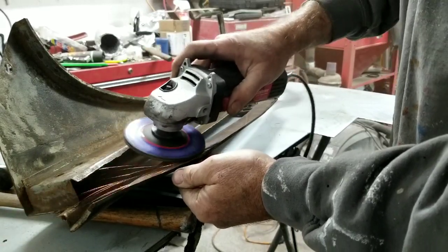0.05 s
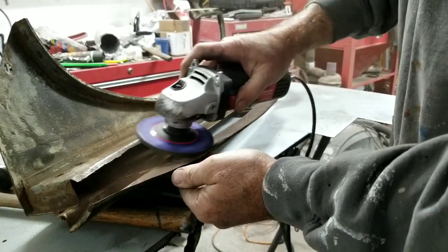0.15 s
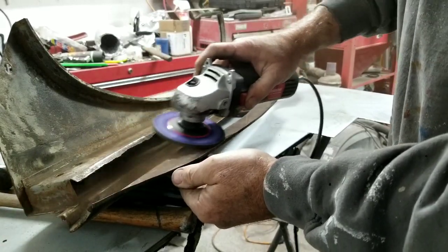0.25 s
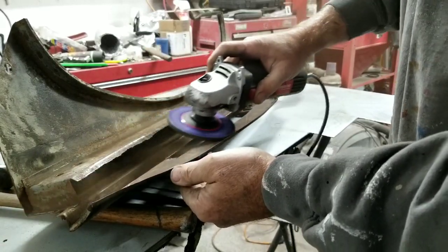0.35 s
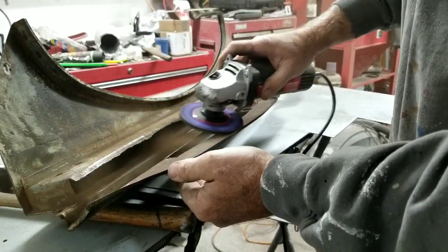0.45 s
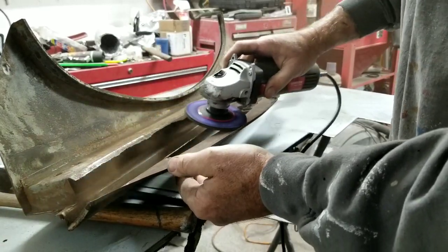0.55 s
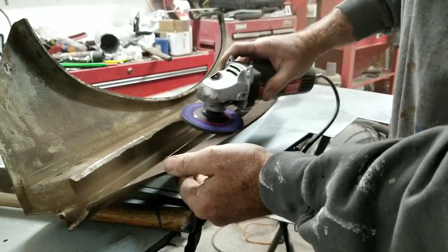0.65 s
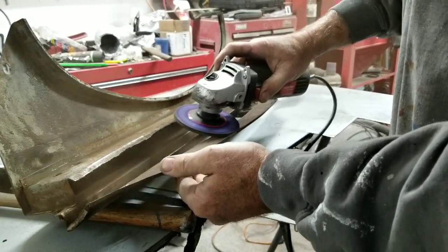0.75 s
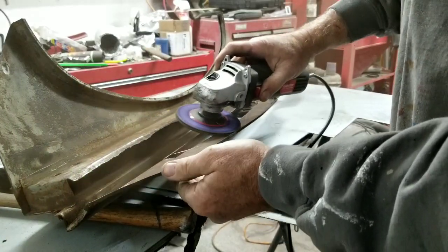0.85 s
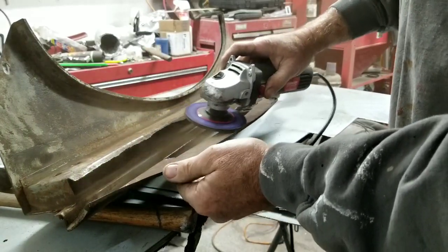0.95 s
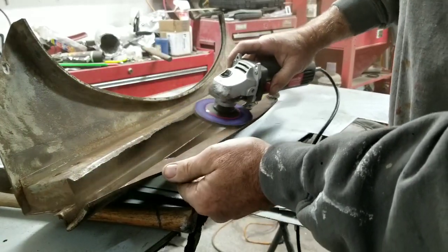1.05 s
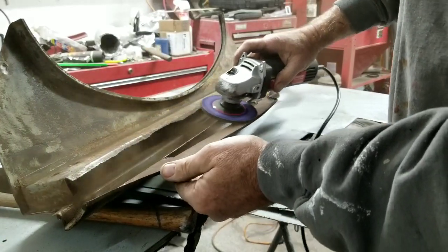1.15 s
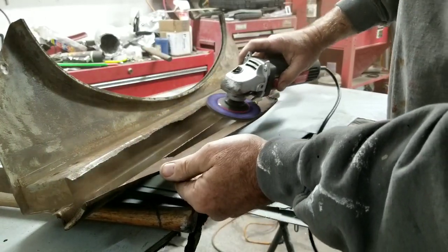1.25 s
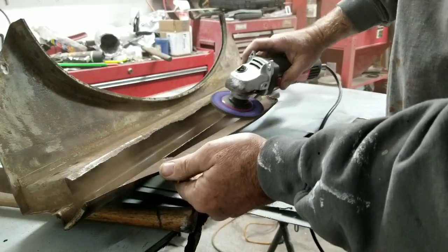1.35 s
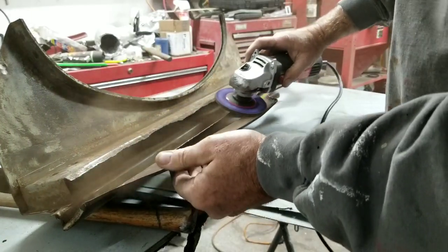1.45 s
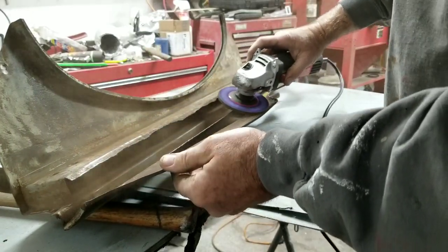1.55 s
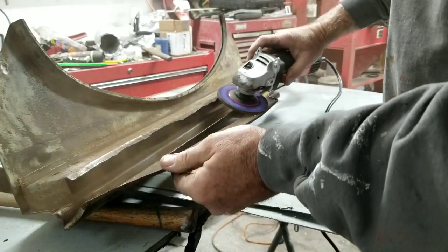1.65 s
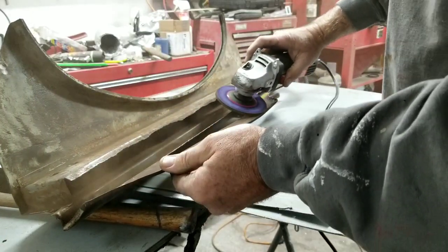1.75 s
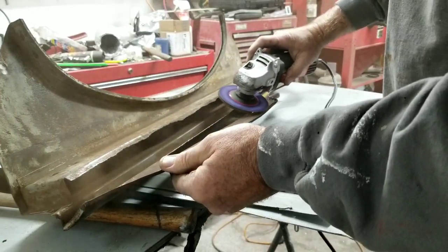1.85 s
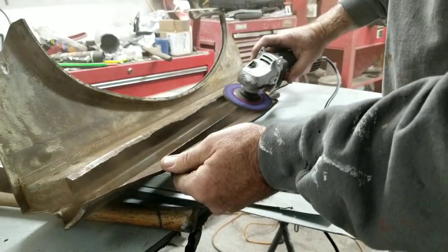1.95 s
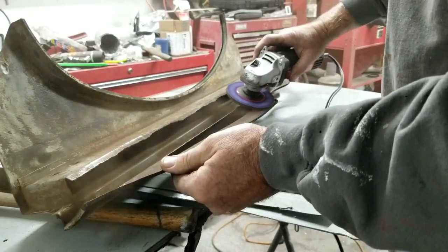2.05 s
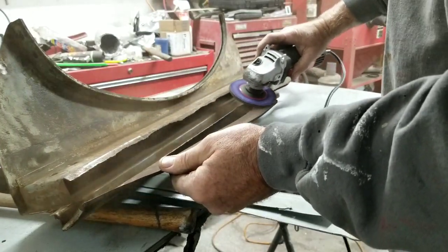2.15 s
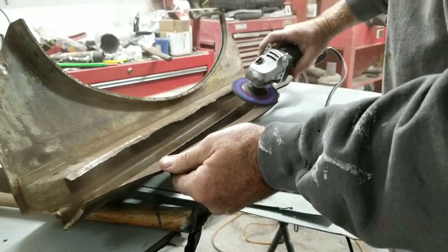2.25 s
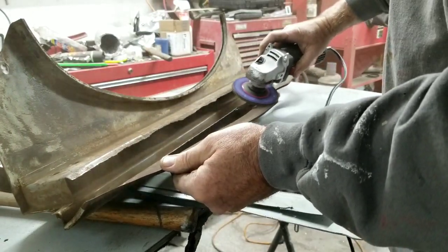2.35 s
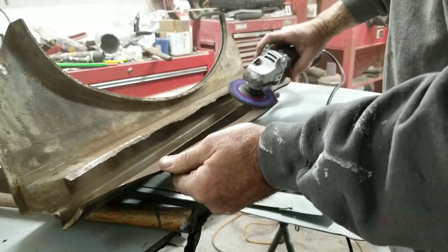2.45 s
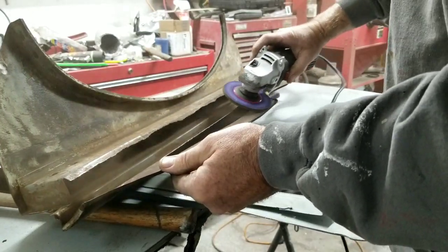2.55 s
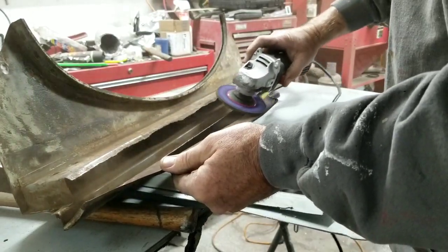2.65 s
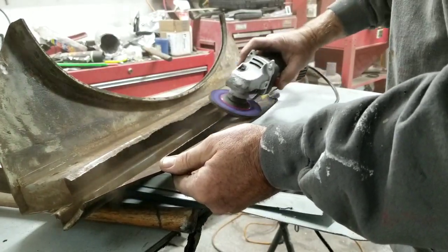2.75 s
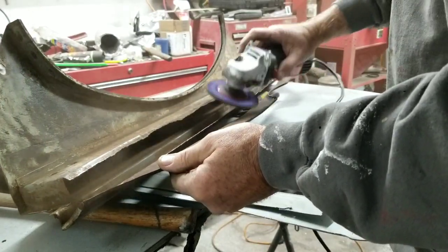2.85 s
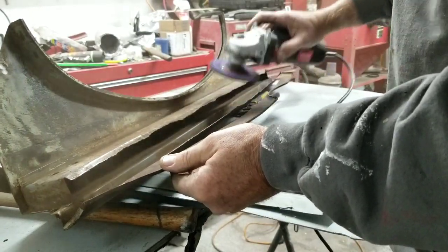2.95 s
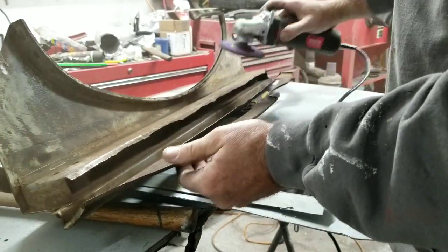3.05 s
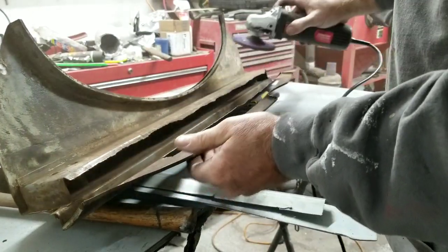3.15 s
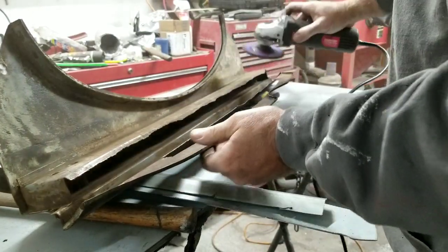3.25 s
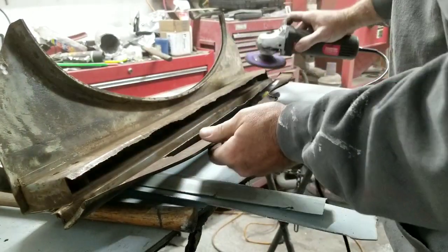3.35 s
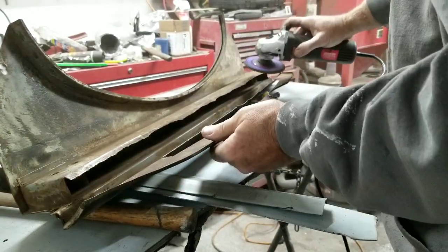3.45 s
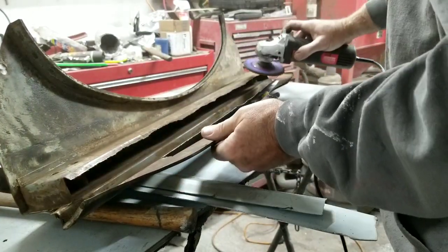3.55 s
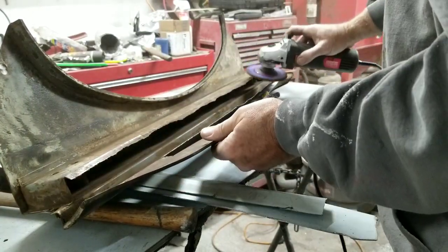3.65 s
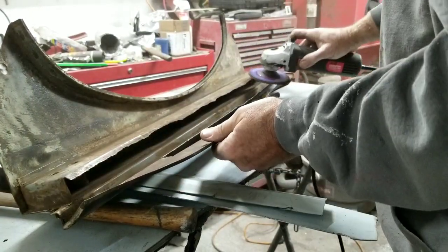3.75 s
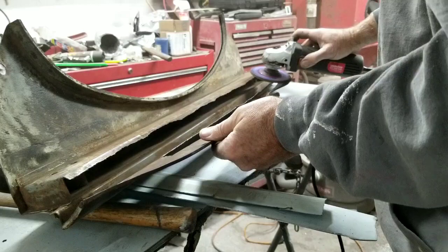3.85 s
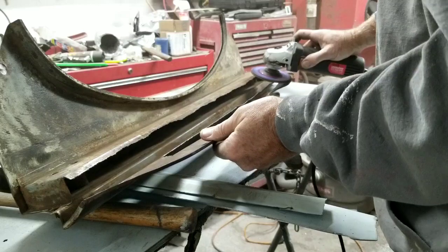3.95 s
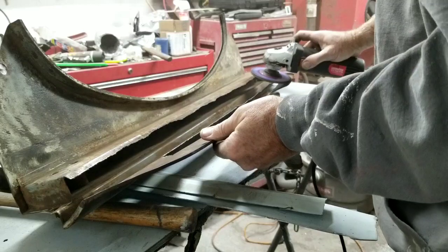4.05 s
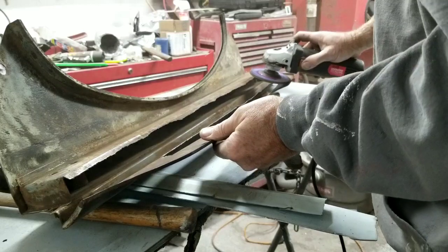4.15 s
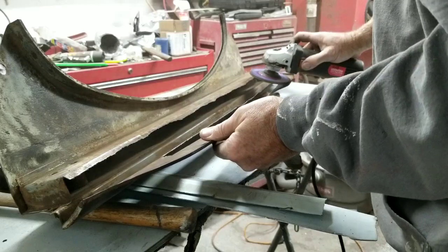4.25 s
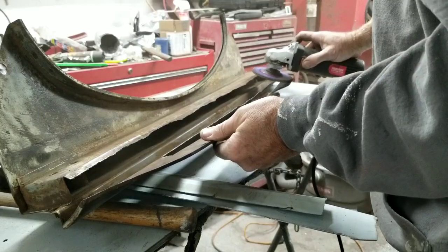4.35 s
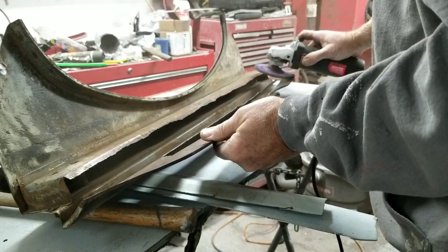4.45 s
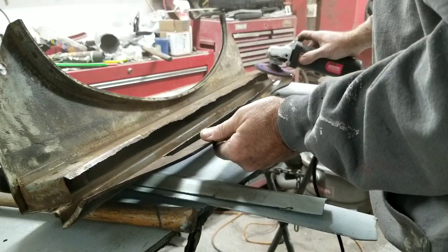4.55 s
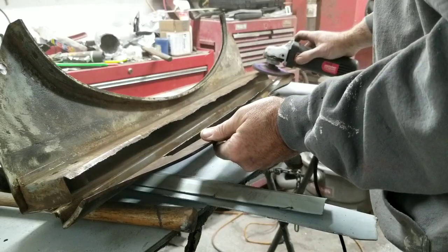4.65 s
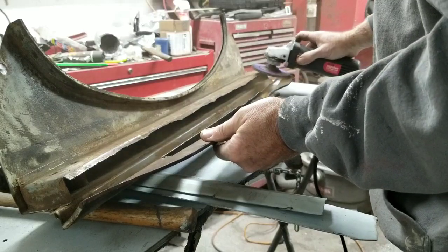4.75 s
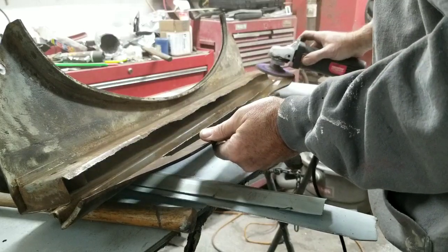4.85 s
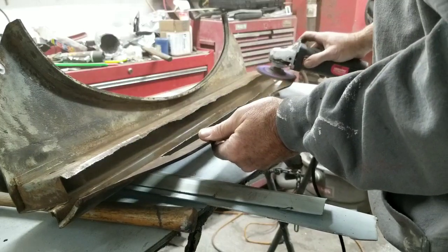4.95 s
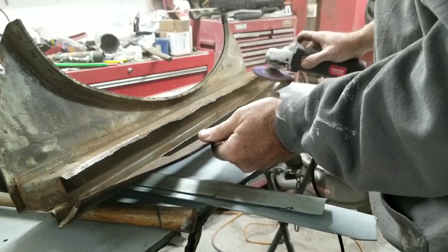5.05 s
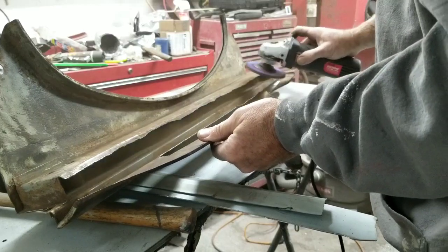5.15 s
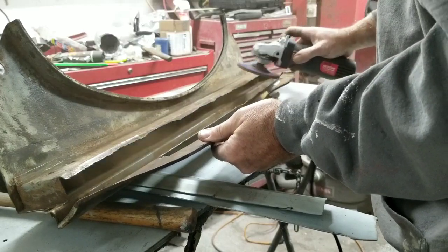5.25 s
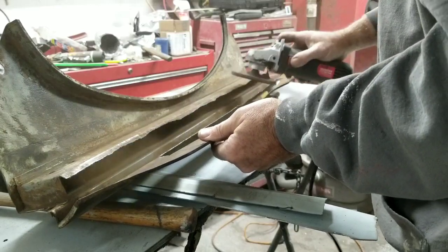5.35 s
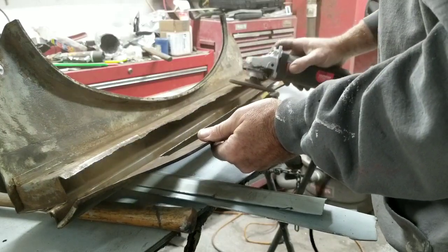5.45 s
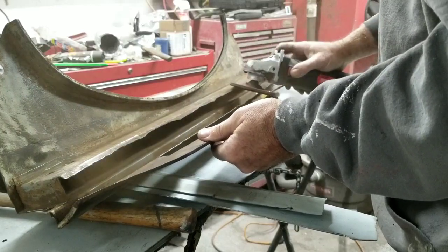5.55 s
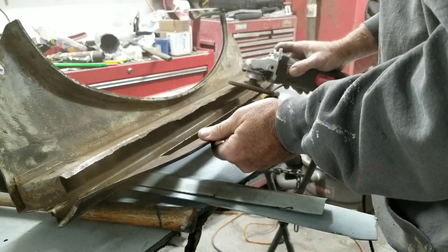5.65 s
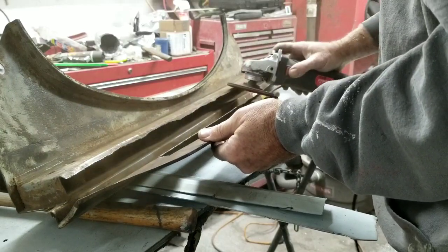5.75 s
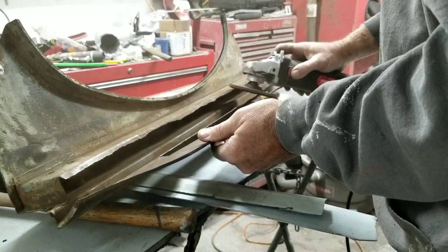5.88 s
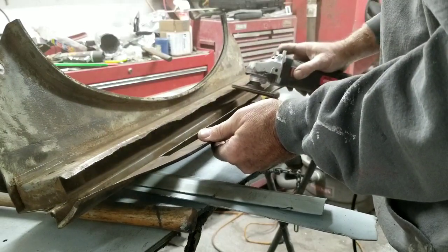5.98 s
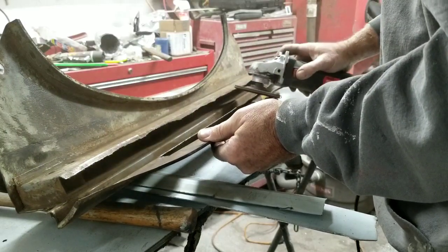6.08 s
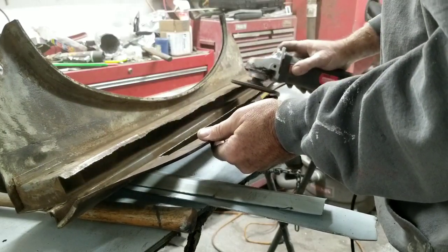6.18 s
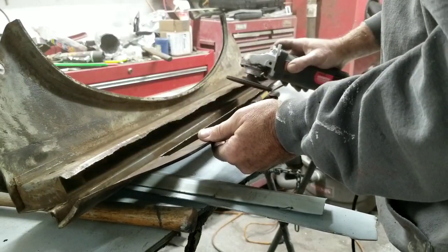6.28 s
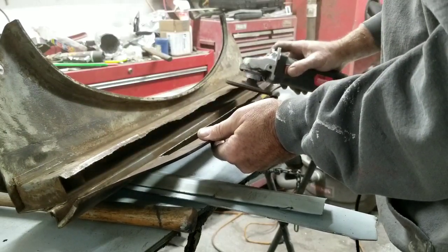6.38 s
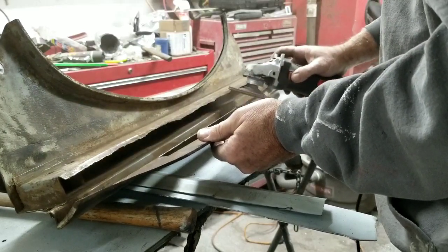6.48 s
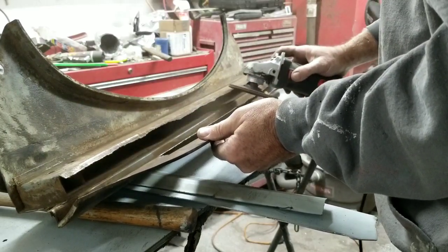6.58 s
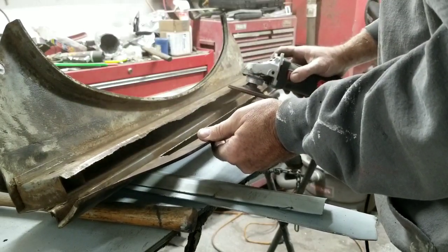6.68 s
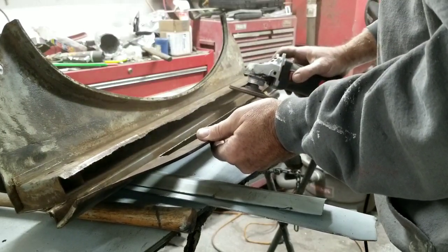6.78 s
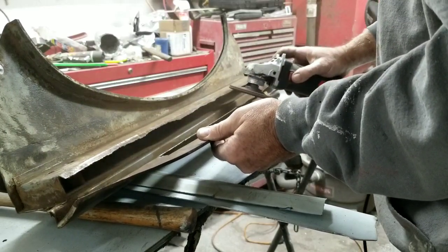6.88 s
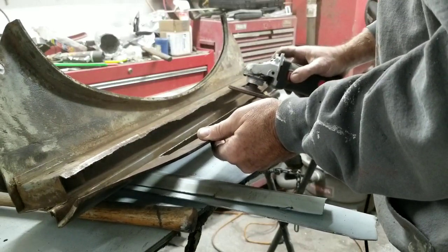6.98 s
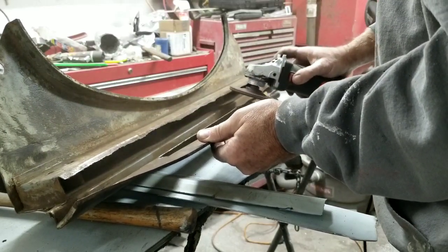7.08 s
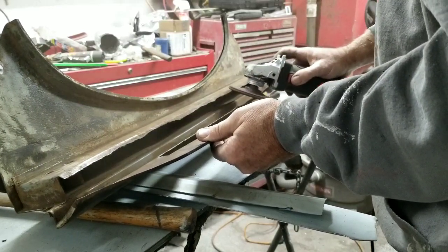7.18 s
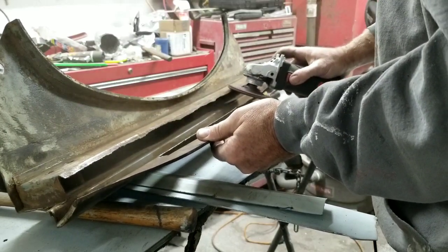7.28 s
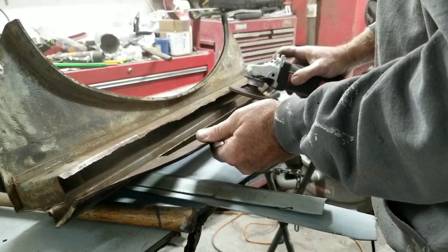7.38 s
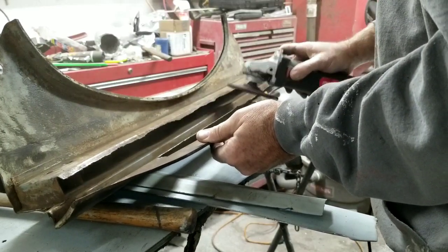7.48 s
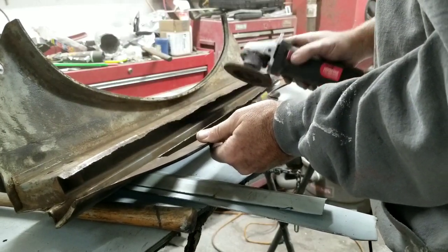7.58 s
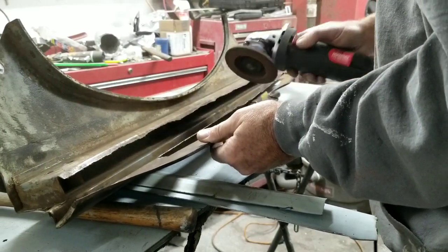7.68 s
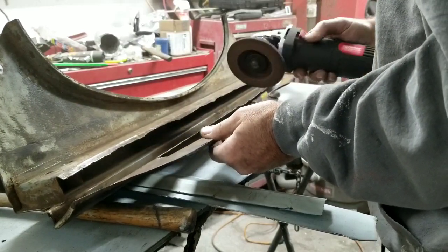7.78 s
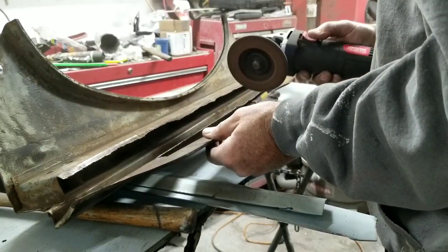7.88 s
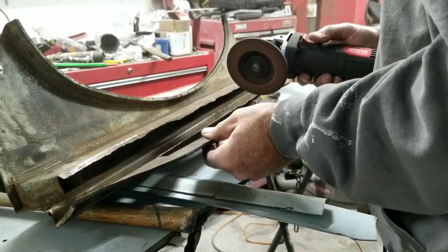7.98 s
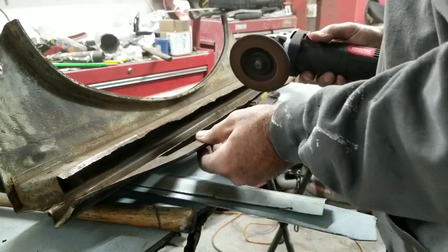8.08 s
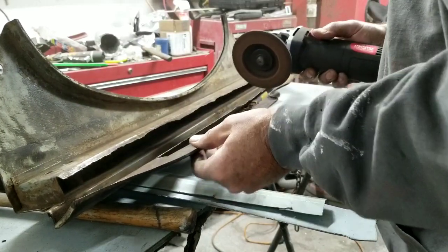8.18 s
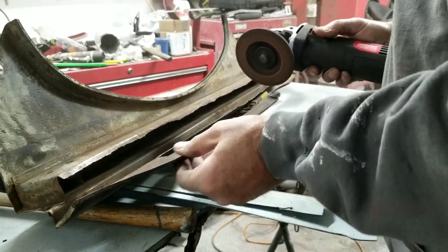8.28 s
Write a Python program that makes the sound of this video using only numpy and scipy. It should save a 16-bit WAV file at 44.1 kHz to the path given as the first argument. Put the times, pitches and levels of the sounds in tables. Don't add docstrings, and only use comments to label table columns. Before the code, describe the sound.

Harsh treble-heavy grinding of rusty sheet metal, fluttering with the fast disc, heard very near a small stereo microphone. A long stroke comes first, then a gap of higher motor whine and airy fan, a second grind, two quick dabs and a last second-long touch. Finally the motor slows only slightly while loose gear teeth chatter. Short workshop echo, faint low bumps.

```python
import sys
import numpy as np
from scipy import signal
from scipy.io import wavfile
from scipy.ndimage import uniform_filter1d, map_coordinates

SR = 44100
rng = np.random.default_rng(int(sys.argv[2]) if len(sys.argv) > 2 else 0)


def convert_level_to_amplitude(level_db):
    exponent = np.asarray(level_db, float) / 20
    return 10 ** exponent


def store_pcm(level_fs):
    pcm = np.round(np.clip(level_fs, -1, 1) * 32767).astype(np.int16)
    wavfile.write(sys.argv[1], SR, np.atleast_2d(pcm).T)


N = 366912
T = np.arange(N) / SR
SWITCH_OFF_S = 7.62


def unit(x):
    return x / np.sqrt(np.mean(x ** 2))


def blur(x, size, axis=-1):
    once = uniform_filter1d(x, size, axis=axis)
    return unit(uniform_filter1d(once, size, axis=axis))


def walk(rate):
    return blur(rng.standard_normal(N), size=int(SR / rate))


def pair(a, b, alike):
    # (time [s], delay [samples])
    capsule_lag = [(0, 4), (.6, 8), (2.3, 6), (2.7, 1), (4.2, 0), (4.7, -9), (5.1, -2), (6.3, 0), (6.7, 5),
                   (7.2, 8), (7.6, -1), (8.3, -8)]
    alike = np.clip(alike, 0, 1)
    lag = np.round(np.interp(T, *np.transpose(capsule_lag))).astype(int)
    late = np.clip(np.arange(N) - lag, 0, N - 1)
    return np.array([a, alike * a[late] + np.sqrt(1 - alike ** 2) * b])


def grinding(turns):
    # (time [s], hand pressure as scrape [dB], sheet vibration [dB])
    face_strokes = [
        [(0.0, -26, -39.5), (0.046, -28, -43), (0.12, -28, -47), (0.154, -30.5, -43.5), (0.186, -22.5, -44.5),
         (0.344, -25, -41), (0.624, -26.5, -45), (0.7, -24.5, -42.5)],
        [(0.71, -27, -42.5), (0.742, -23, -44), (0.756, -29, -48.5), (0.786, -24, -43), (0.844, -25.5, -44.5),
         (1.1, -26.5, -41.5), (1.412, -27.5, -44), (1.43, -23.5, -44)],
        [(1.44, -29.5, -43), (1.698, -31, -47.5), (1.726, -28.5, -45), (1.974, -32.5, -46), (1.98, -33, -48.5),
         (2.042, -26, -49), (2.052, -26.5, -45.5), (2.15, -30, -45)],
        [(2.16, -28, -44), (2.304, -27.5, -46), (2.412, -27, -45), (2.468, -28.5, -45.5), (2.716, -24.5, -44),
         (2.74, -30.5, -40.5), (2.832, -29, -44), (2.86, -27.5, -49)],
    ]
    # (time [s], hand pressure as scrape [dB], sheet vibration [dB])
    edge_strokes = [
        [(3.82, -27.5, -45.5), (3.878, -27.5, -49.5), (3.886, -34.5, -43.5), (4.262, -25.5, -39.5),
         (4.276, -21, -39), (4.364, -30.5, -44.5), (4.476, -26.5, -41.5), (4.5, -26, -46)],
        [(4.51, -26.5, -45), (4.54, -28, -43), (4.794, -28, -46.5), (4.802, -27, -46), (4.864, -27.5, -46),
         (5.038, -29, -40), (5.154, -28, -48.5), (5.17, -35.5, -50.5)],
        [(6.55, -24, -46.5), (6.576, -28.5, -48.5), (6.784, -24, -42.5), (6.83, -30, -56),
         (6.836, -26.5, -46.5), (6.9, -28.5, -43.5), (6.988, -27.5, -48.5), (7.05, -24.5, -44)],
        [(7.06, -29.5, -48.5), (7.188, -28.5, -47.5), (7.194, -32.5, -51.5), (7.23, -24, -46.5),
         (7.428, -30, -44.5), (7.496, -28.5, -57), (7.514, -26.5, -46), (7.55, -31, -44.5)],
    ]
    # (time [s], hand pressure as scrape [dB], sheet vibration [dB])
    dabs = [
        [(5.598, -24, -41.5), (5.626, -24, -49.5), (5.65, -24, -43.5), (5.676, -25.5, -47.5),
         (5.69, -29.5, -44.5)],
        [(5.8, -26.5, -47), (5.954, -26, -48), (5.976, -29.5, -49), (6.152, -33, -45), (6.208, -26, -46),
         (6.25, -38.5, -46)],
    ]
    # (time [s], peak level [dB])
    snags = [
        (0.74, -13),
        (2.3994, -13.5),
        (2.6738, -18.5),
        (4.2594, -25),
        (5.0175, -12),
    ]
    # (time [s], share [1])
    chatter = [(0, 0.086), (3, 0.12), (3.8, 0.36), (4.1, 0.45), (4.6, 0.67), (5.2, 0.7), (6.3, 0.25),
               (6.6, 0.4), (7.6, 0.83)]
    # (frequency [Hz], level per Hz [dB])
    scrape_tone = [(4410, -34.5), (7500, -17), (9880, -7.5), (12300, -0.5), (13400, -3.5), (14000, 0.5),
                   (14600, 4)]
    # (frequency [Hz], level per Hz [dB])
    drone_tone = [(200, -62), (340, -28), (411, -7), (663, -9), (1060, -2.5), (1320, -2.5), (1870, 0),
                  (2090, -2.5), (2340, 2.5), (3300, -5), (4290, -60), (7260, -120)]
    # (frequency [Hz], level per Hz [dB])
    ring_tone = [(1940, -47), (3300, -4), (3520, 2), (4800, 1), (6080, -0.5), (6610, -2.5), (7800, -6),
                 (10100, -5), (17200, -120)]

    strokes = face_strokes + edge_strokes + dabs
    s, press, free = np.transpose(sorted(row for stroke in strokes for row in stroke))
    scrape_db, free_db = np.interp(T, s, press), np.interp(T, s, free)
    snag_s, snag_gain_db = 0.0082, 17
    for bite_s, db in snags:
        scrape_db = scrape_db + (db + snag_gain_db) * np.exp(-.5 * ((T - bite_s - snag_s) / snag_s) ** 2)

    pressure, vibration = scrape_db + 27.5, free_db + 44
    drone_db = -40.5 + 0.01 * pressure + 1.23 * vibration
    ring_db = -39.5 + pressure + 0.67 * vibration
    lower_db = -34 + 0.54 * pressure + 0.2 * vibration

    touch_db, pan_db, breadth_db = contact()
    shake = walk(36)
    wobble = 1 + 0.11 * np.sin(2 * np.pi * turns)

    scrape = colour(grit(turns, 0.6, 2.2, 0.58), scrape_tone, patchy_db=3.0, patch_hz=100, patch_s=.16)
    split_hz = 10000
    lower = signal.sosfiltfilt(signal.butter(3, split_hz, fs=SR, output="sos"), scrape)
    upper = convert_level_to_amplitude(scrape_db + 1.04) * unit(scrape - lower)
    scrape = (upper + convert_level_to_amplitude(lower_db + breadth_db) * unit(lower)) * convert_level_to_amplitude(1.2 * shake) * wobble

    blurred = np.interp(T, *np.transpose(chatter)) * rng.standard_normal((2, N))
    drone = unit(grit(turns, .93, 0.59, 0.6)) + blurred
    drone = colour(drone, drone_tone, patchy_db=3.6, patch_hz=60, patch_s=.04)

    ring = colour(grit(turns, 0.76, 0.93, 0.45), ring_tone, patchy_db=3.6, patch_hz=70, patch_s=0.11)
    ring = ring * convert_level_to_amplitude(0.58 * shake)

    side = convert_level_to_amplitude((pan_db + 1.8 * walk(7.5)) * np.array([[.5], [-.5]]))
    return convert_level_to_amplitude(touch_db) * (side * (scrape + convert_level_to_amplitude(ring_db) * ring) + convert_level_to_amplitude(drone_db) * drone)


def contact():
    # (full contact [s], lift [s], landing time [ms], left minus right [dB], breadth of contact [dB])
    touches = [
        (-.1, 2.86, 75, 3.2, 1.5),
        (3.816, 5.175, 55, 4, 1),
        (5.596, 5.685, 40, 3, -5),
        (5.794, 6.25, 42, 3.5, -3),
        (6.538, 7.54, 16, 3.5, 0),
    ]
    landing_db, lift_db_per_s = -41, -300
    land, lift, landing_ms, pan_db, breadth_db = np.transpose(touches)[:, :, None]
    landing = np.minimum(landing_db * (land - T) * 1e3 / landing_ms, 0)
    lifting = np.minimum(lift_db_per_s * (T - lift), 0)
    db = landing + lifting
    now = db.argmax(axis=0)
    return db.max(axis=0), pan_db[now, 0], breadth_db[now, 0]


def grit(turns, memory, spiky_db, alike, count=320):
    memory = np.clip(memory, 0, .97)
    fresh = rng.standard_normal((2, int(turns[-1]) + 2, count))
    worn = signal.lfilter([np.sqrt(1 - memory ** 2)], [1, -memory], fresh, axis=1)
    worn = worn * convert_level_to_amplitude(spiky_db * rng.standard_normal(worn.shape[1:]))
    place = [turns * count]
    a, b = (map_coordinates(w.ravel(), place, order=2, prefilter=False) for w in worn)
    return pair(a, b, alike)


def ridges(f, t):
    # (time [s], drone [Hz], ring [Hz], lower scrape [Hz], upper scrape [Hz])
    resonances = [(0.1, 1410, 4440, 9670, 13200), (0.85, 1480, 5100, 9940, 13500),
                  (1.0, 2280, 5150, 9980, 13300), (1.3, 2060, 5170, 9520, 13170),
                  (1.8, 2160, 5760, 9400, 13000), (2.1, 2110, 4600, 9070, 13600),
                  (2.6, 2220, 5300, 11200, 13600), (2.9, 2190, 5530, 11500, 13300),
                  (3.8, 1594, 4750, 11400, 13000), (4.1, 1660, 5000, 11000, 13100),
                  (4.15, 1470, 5200, 11000, 13400), (4.33, 1430, 5400, 11000, 13240),
                  (4.4, 1760, 5640, 10500, 12800), (4.9, 1520, 6500, 10200, 13200),
                  (5.05, 1580, 7100, 9700, 13700), (5.6, 2220, 5430, 10900, 13030),
                  (5.85, 2175, 5500, 10800, 13640), (6.25, 2000, 5370, 10300, 13200),
                  (6.55, 1790, 5030, 10300, 13340), (6.75, 2020, 4930, 10480, 13500),
                  (7.5, 1674, 4700, 9980, 13400)]
    # (width [Hz], level [dB])
    peak_shapes = [
        (70, 8),
        (130, 2.5),
        (170, 2.5),
        (170, 7.5),
    ]
    shoulder = (380, 2)
    s, *tracks = np.transpose(resonances)
    shapes = list(zip(tracks, peak_shapes)) + [(hz, shoulder) for hz in tracks[2:]]
    gain_db = 0
    for hz, (width, db) in shapes:
        gain_db = gain_db + db * np.exp(-.5 * ((f[:, None] - np.interp(t, s, hz)) / width) ** 2)
    return gain_db


def colour(x, spectrum, patchy_db, patch_hz, patch_s, sheet=True):
    # (time [s], level [dB])
    echo_dip = [(0, -2), (1.0, -5.5), (1.25, -5.5), (2.0, -6), (2.85, -6), (2.95, -1), (3.8, -1.5),
                (4.2, -3), (5.6, -2), (5.9, -5), (6.3, -2.5), (6.6, -2), (7.5, -6), (7.6, -2)]
    dip_hz, dip_width_hz = 3600, 380
    f, t, z = signal.stft(x, SR, nperseg=1024)
    hz, db = np.transpose(spectrum)

    patches = blur(rng.standard_normal(z.shape), size=max(int(patch_hz / f[1]), 1), axis=1)
    patches = blur(patches, size=max(int(patch_s * SR / 512), 1), axis=2)
    patches = (patches + patches[0]) / np.sqrt(2 + 2 * np.array([[[1]], [[0]]]))

    shape = np.interp(np.log(f + 1), np.log(hz), db, left=-90, right=-90)[:, None]
    if sheet:
        shape = shape + ridges(f, t)
    dip_shape = np.exp(-.5 * ((f[:, None] - dip_hz) / dip_width_hz) ** 2)
    dip = np.interp(t, *np.transpose(echo_dip)) * dip_shape
    gain = convert_level_to_amplitude(shape + dip + patchy_db * patches)
    gain = gain / np.sqrt(np.mean(gain ** 2, axis=(0, 1)))
    return unit(signal.istft(z * gain, SR, nperseg=1024)[1][:, :N])


def shudders(turns):
    # (start [s], length [s], level [dB])
    hums = [(0.501, 0.042, -61.5), (0.69, 0.046, -64.5), (0.839, 0.064, -56.5), (1.172, 0.087, -55),
            (1.335, 0.1, -62), (1.514, 0.051, -60), (1.786, 0.082, -56.5), (2.55, 0.039, -58),
            (2.938, 0.024, -64), (4.343, 0.036, -63), (4.413, 0.063, -56), (5.088, 0.15, -59),
            (5.454, 0.025, -63), (5.54, 0.086, -62.5), (6.029, 0.041, -61), (6.107, 0.045, -61),
            (6.204, 0.11, -64), (6.332, 0.049, -66), (6.968, 0.044, -64), (7.158, 0.04, -67),
            (7.23, 0.12, -61.5), (7.373, 0.034, -66), (7.438, 0.055, -62), (7.547, 0.04, -67)]
    # (time [s], level [dB])
    singing = [(0, -58), (.9, -58), (1.05, -57), (1.35, -47), (1.6, -50.5), (1.9, -52), (2.2, -68),
               (2.4, -69), (2.5, -47), (2.75, -48), (2.88, -51), (2.95, -80)]
    edge_s, singing_order = 0.0083, 16
    gate = 0
    for s, length, db in hums:
        inside = np.minimum(T - s, s + length - T)
        gate = gate + convert_level_to_amplitude(db) * np.clip(inside / edge_s + .5, 0, 1)
    flicker = walk(32)
    low_phase = 2 * 2 * np.pi * turns + .8 * walk(30) - np.array([[0], [.7]])
    low = gate * convert_level_to_amplitude(3.5 * flicker) * np.sin(low_phase)
    sing_phase = singing_order * 2 * np.pi * turns - np.array([[0], [1.6]])
    sing = convert_level_to_amplitude(np.interp(T, *np.transpose(singing)) + 4.8 * flicker) * np.sin(sing_phase)
    return np.sqrt(2) * (low + sing)


def motor(turns):
    # (time [s], fan air [dB], armature hum [dB], upper whine [dB], side orders [dB])
    levels = [(0, -36, -61, -47, -7), (.8, -34, -55, -60, -3), (1.3, -37.5, -55, -42, -15),
              (2.8, -39.5, -57, -64, -13), (3.17, -34, -40, -59.5, 14), (3.48, -34.5, -48, -40, -8.5),
              (3.74, -34.5, -53, -45, -3), (3.82, -36, -55.5, -38, -7), (4.0, -36, -55, -47, -5),
              (4.5, -36.5, -50.5, -58, -2), (4.66, -38, -71, -50, 0), (4.73, -37.5, -66, -47, -5),
              (4.85, -39, -76, -54, -5), (4.97, -40, -63, -58, -2), (5.25, -39, -57.5, -55, 0),
              (5.44, -36.5, -43.5, -57, 2), (5.51, -35, -51.5, -43, -3), (5.58, -35.5, -55, -39, -0.5),
              (5.62, -37, -57.5, -60, -5), (6.25, -38, -61, -70, -7), (6.33, -40, -56, -42, -9),
              (6.5, -36, -57.5, -48.5, -3), (7.55, -40, -61, -50, -12), (7.75, -40, -55, -63, -6),
              (8.05, -40.5, -58.5, -60, -4), (8.32, -42, -64.5, -53, -7)]
    # (beats per armature turn [1], level [dB])
    whine_orders = [(2, -12.5), (3, -7), (5, -2.5), (7, -4), (12, -19)]
    # (frequency [Hz], level per Hz [dB])
    air_tone = [(350, -11.5), (500, -13.5), (850, -7.5), (1500, -8.5), (2300, -5), (3000, -1.5), (3400, -6),
                (4500, -4.5), (8000, -8), (10500, -4), (13200, 0), (14600, -2.5)]
    main_order, load_damping_db = 5, -12.5

    s, *columns = np.transpose(levels)
    air_db, hum_db, whine_db, side_db = (np.interp(T, s, c) for c in columns)
    touch = convert_level_to_amplitude(contact()[0])
    right = np.array([[0], [1.]])

    hum_waver = (2.2 * walk(12) + 3.6 * walk(32)) * (0.35 + 0.65 * touch)
    hum = convert_level_to_amplitude(hum_db + hum_waver) * np.sin(2 * np.pi * turns - 0.9 * right)

    whine = 0
    for order, db in whine_orders:
        waver = 0.42 * 2.2 * walk(12)
        level = convert_level_to_amplitude(db + (order != main_order) * side_db + waver)
        phase = order * 2 * np.pi * turns + right * (order + 2.56 * walk(4.9))
        whine = whine + level * np.sin(phase)
    whine = convert_level_to_amplitude(whine_db + load_damping_db * touch) * whine

    air = pair(*rng.standard_normal((2, N)), 0.13)
    air = colour(air, air_tone, patchy_db=1.6, patch_hz=200, patch_s=.06, sheet=False)
    flutter = .7 * walk(25)
    return np.sqrt(2) * (hum + whine) + convert_level_to_amplitude(air_db + flutter + np.array([[1], [-1]])) * air


def backlash(rise_s=0.0024, spiky_db=3.5):
    # (time [s], peak level [dB], treble share [dB], ring-out [ms])
    knocks = [(7.636, -33, 10, 11.1), (7.684, -31, 5, 8.3), (7.734, -28, 2, 10), (7.781, -27.5, 9, 15),
              (7.823, -26, 3, 7.85), (7.8414, -31.5, 5, 33), (7.8744, -35, 1, 49), (7.9214, -30, 11.5, 9),
              (7.9394, -36, -6, 9), (7.964, -31.5, 8, 25), (7.9994, -33, 4, 17), (8.029, -28, 6.5, 9.6),
              (8.071, -24.5, 4, 11), (8.114, -23.5, 3, 7.1), (8.1544, -34, 8, 9.9), (8.163, -30, 2, 32),
              (8.2075, -30.5, 3, 45), (8.2594, -33, 6, 14), (8.2814, -27.5, 6, 7.1), (8.3124, -21, 3.5, 10)]
    # (frequency [Hz], width [Hz], level [dB])
    gearbox = [(2840, 400, -26), (3760, 670, 2.5), (4580, 790, 6), (6200, 670, 2.5), (8300, 3600, -1.5),
               (11000, 530, 6.5), (12700, 1500, 1.5)]
    first = int(SWITCH_OFF_S * SR) - SR // 10
    clicks = pair(*rng.standard_normal((2, N)), 0.039) * convert_level_to_amplitude(spiky_db * rng.standard_normal(N))
    clicks = clicks[:, first:]

    body = treble = 0
    for hz, width, db in gearbox:
        band = unit(signal.lfilter(*signal.iirpeak(hz, hz / width, SR), clicks)) * convert_level_to_amplitude(db)
        if hz > 7000:
            treble = treble + band
        else:
            body = body + band

    low = high = 0
    for s, db, treble_db, ring_ms in knocks:
        age = T[first:] - s - .003
        knock = convert_level_to_amplitude(db - 19.5) * np.exp(np.where(age < 0, age / rise_s, -age * 1e3 / ring_ms))
        low = low + knock
        high = high + convert_level_to_amplitude(treble_db) * knock
    rattle = (low * body + high * treble) * convert_level_to_amplitude(1.6 * np.array([[1], [-1]]))
    return np.pad(rattle, ((0, 0), (first, 0)))


def thumps():
    # (time [s], peak level [dB])
    bumps = [
        (3.799, -75),
        (5.59, -72),
        (5.789, -72),
        (6.539, -77),
        (7.779, -76),
        (7.969, -73),
        (8.149, -80),
        (8.309, -78),
    ]
    thump_s, thump_hz, gain_db, floor_db = 0.0054, 283, 14.5, -99
    low_pass = signal.butter(3, thump_hz, fs=SR, output="sos")
    low = unit(signal.sosfilt(low_pass, pair(*rng.standard_normal((2, N)), 0.37)))
    level = convert_level_to_amplitude(floor_db + 1.6 * walk(19))
    for s, db in bumps:
        level = level + convert_level_to_amplitude(db + gain_db) * np.exp(-.5 * ((T - s) / thump_s) ** 2)
    return low * level


def workshop(x, t60_s=0.28, wet_db=-17):
    age = np.arange(SR // 3) / SR
    tail = rng.standard_normal((2, len(age))) * np.exp(-np.log(1000) * age / t60_s) * (age > .004)
    tail = tail / np.sqrt(np.sum(tail[0] ** 2))
    return x + convert_level_to_amplitude(wet_db) * signal.fftconvolve(x, tail, axes=1)[:, :N]


def drop_faint_bands(x, follow=0.94):
    # (frequency [Hz], level per bin against loudness [dB])
    faint_limit = [(290, -63), (330, -44), (400, -47.5), (650, -42.5), (1200, -44), (2200, -42),
                   (2900, -43.5), (3500, -45), (4500, -46), (6000, -43.5), (7500, -38.5), (10000, -69)]
    # (start [s], length [s], silent below [Hz])
    bass_gaps = [(.575, .025, 480), (.66, .025, 480), (1.19, .02, 480), (1.26, .025, 480),
                 (4.57, .025, 620), (4.65, .05, 950), (4.76, .15, 520), (4.87, .035, 720),
                 (5.035, .045, 480), (5.61, .025, 720), (5.67, .02, 480)]
    turn = np.array([[1, 1], [1, -1]]) / np.sqrt(2)
    f, t, z = signal.stft(turn @ x, SR, window="cosine", nperseg=2048)
    power = np.abs(z) ** 2
    loud = power.sum(axis=(0, 1))
    edges = np.arange(0, len(f), 4)
    band = np.searchsorted(edges, np.arange(len(f)), "right") - 1
    tops = np.maximum.reduceat(power, edges, axis=1)[:, band]

    hz, db = np.transpose(faint_limit)
    limit = convert_level_to_amplitude(np.interp(np.log(f + 1), np.log(hz), db))[:, None] ** 2
    floor = limit * loud.mean() * (loud / loud.mean()) ** follow
    keep = tops > floor
    for s, length, top in bass_gaps:
        during = np.abs(t - s - length / 2) < length / 2 + .006
        keep = keep & ~((f[:, None] < top) & during)
    return turn @ signal.istft(z * keep, SR, window="cosine", nperseg=2048)[1][:, :N]


def scene():
    # (time [s], armature speed [turns per s])
    speed = [
        [(0.0, 405), (.25, 416), (.5, 413), (.95, 423), (1.15, 411), (1.55, 402), (1.95, 417), (2.2, 412),
         (2.85, 423)],
        [(3.2, 454), (3.62, 474), (3.82, 481), (4.2, 453), (4.55, 443), (5.0, 424), (5.2, 422), (5.4, 447),
         (5.62, 461)],
        [(5.9, 466), (6.25, 451), (6.55, 471), (6.75, 455), (7.0, 442), (7.35, 428), (7.6, 424)],
    ]
    gear_ratio, coast_s = 37 / 12, 3.2
    hz = np.interp(T, *np.vstack(speed).T) * np.exp(-np.maximum(T - SWITCH_OFF_S, 0) / coast_s)
    turns = np.cumsum(hz * (1 + 0.001022 * walk(11.15))) / SR
    disc_turns = turns / gear_ratio
    return workshop(grinding(disc_turns) + motor(turns) + backlash() + shudders(disc_turns))


def top_cut(x):
    return signal.sosfilt(signal.butter(12, 15750, fs=SR, output="sos"), x)


def record(dry):
    low_cut_hz, top_hz = 88, 14450
    x = drop_faint_bands(dry) + thumps()
    x = signal.sosfilt(signal.butter(2, low_cut_hz, "high", fs=SR, output="sos"), x)
    x = signal.sosfilt(signal.ellip(10, .2, 80, top_hz, fs=SR, output="sos"), x)
    return top_cut(x)


dry = scene()
out = record(dry)
store_pcm(out)
```